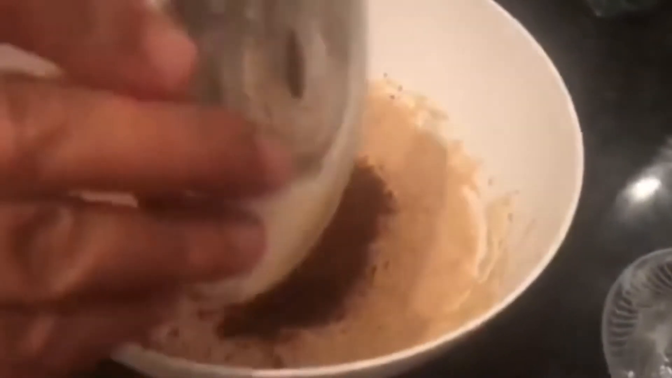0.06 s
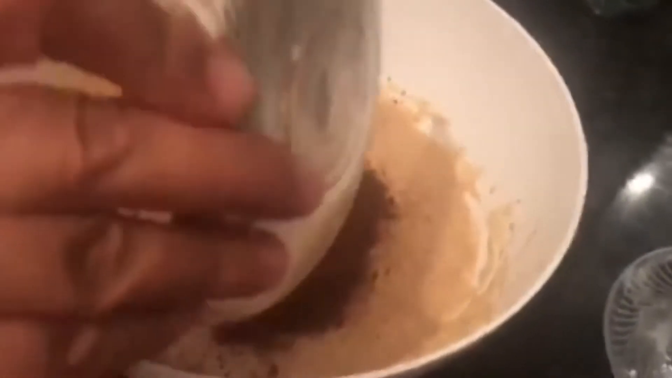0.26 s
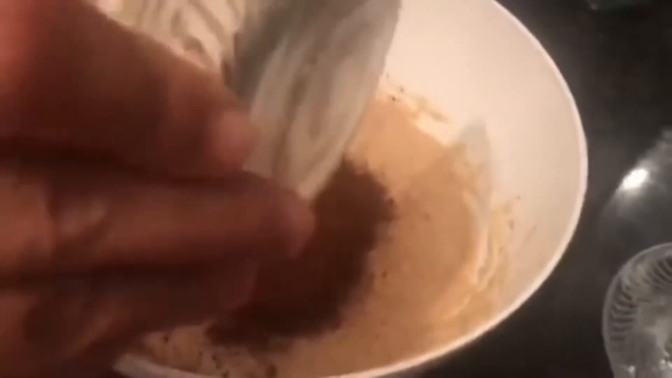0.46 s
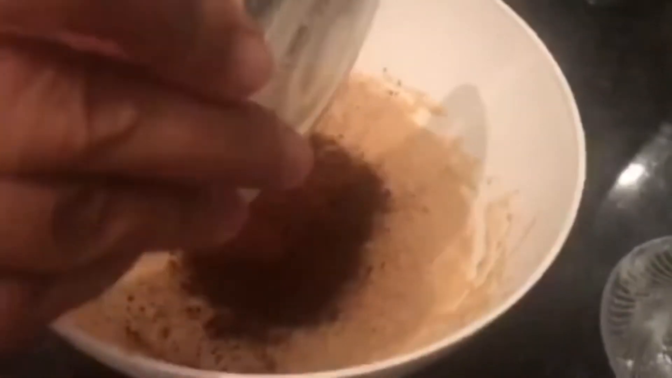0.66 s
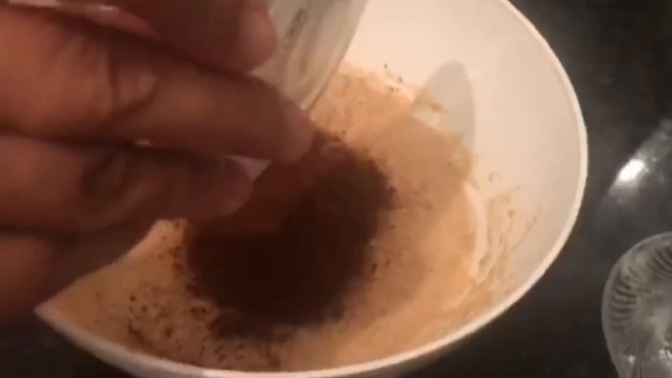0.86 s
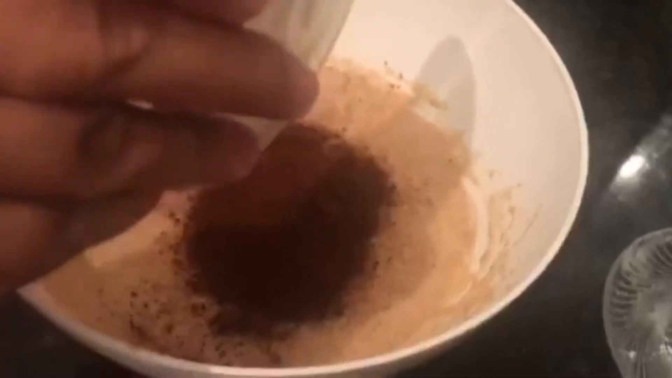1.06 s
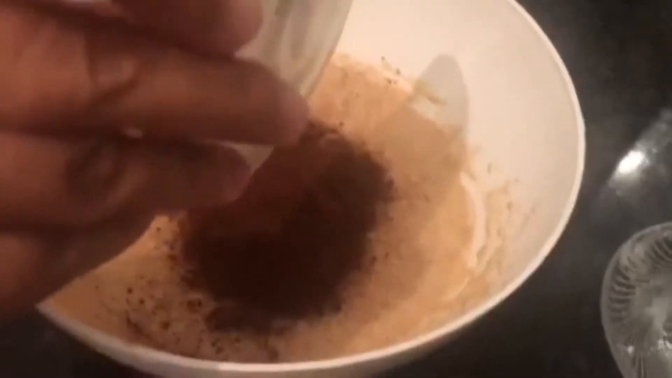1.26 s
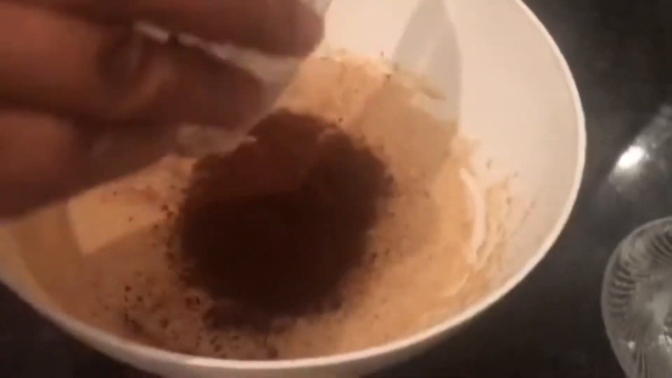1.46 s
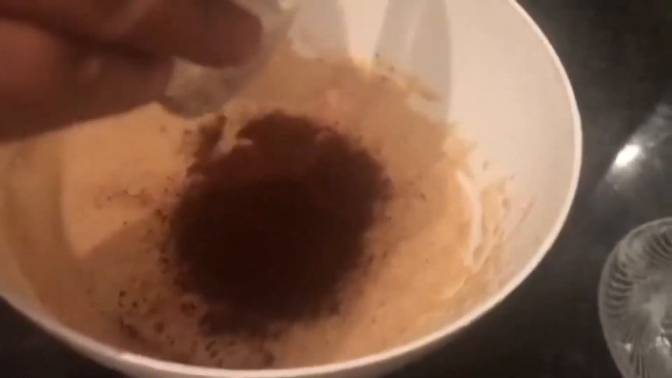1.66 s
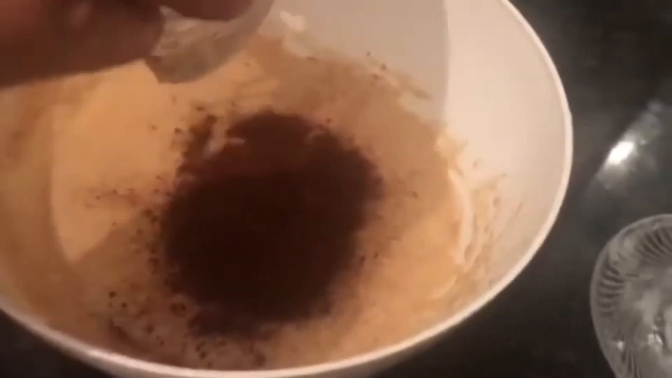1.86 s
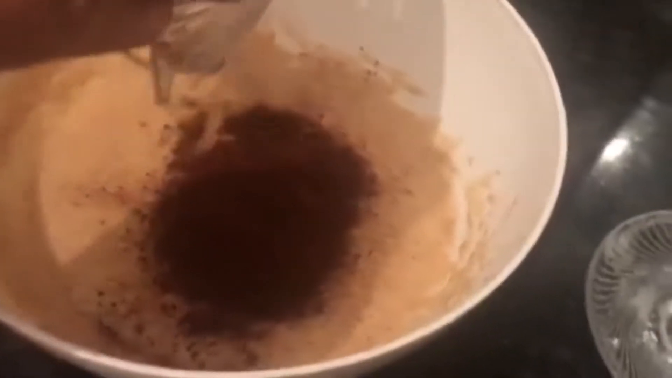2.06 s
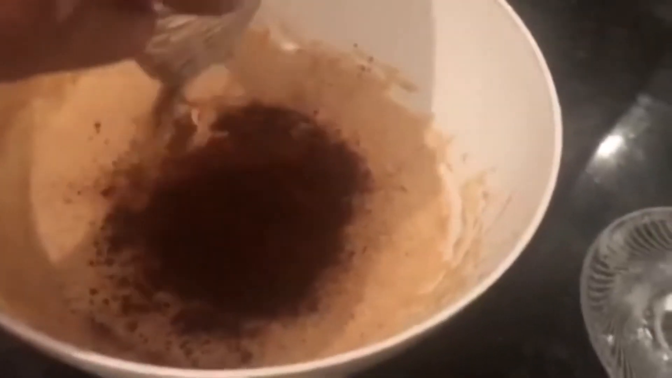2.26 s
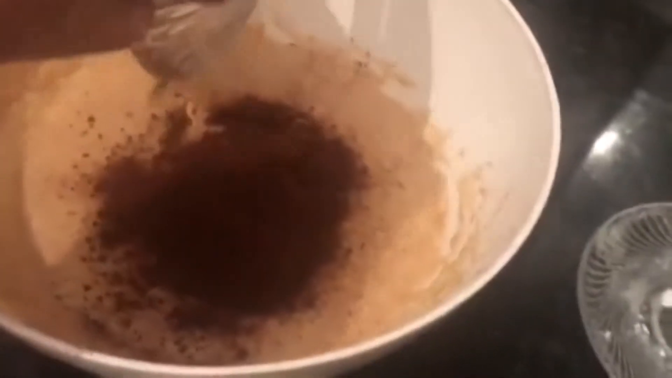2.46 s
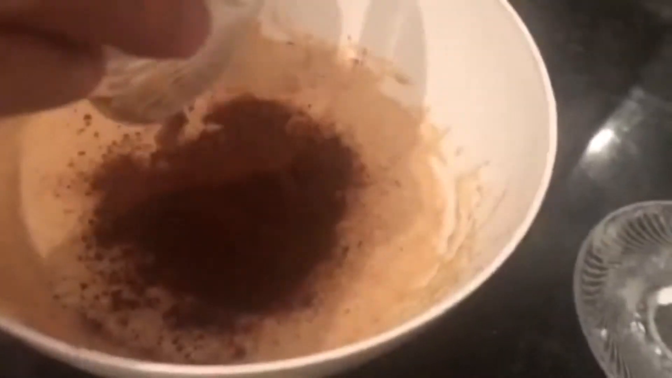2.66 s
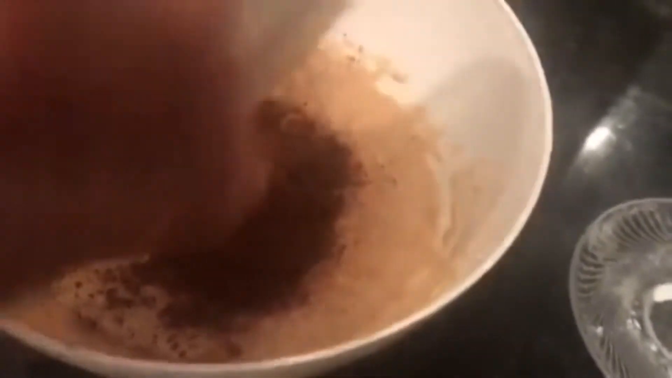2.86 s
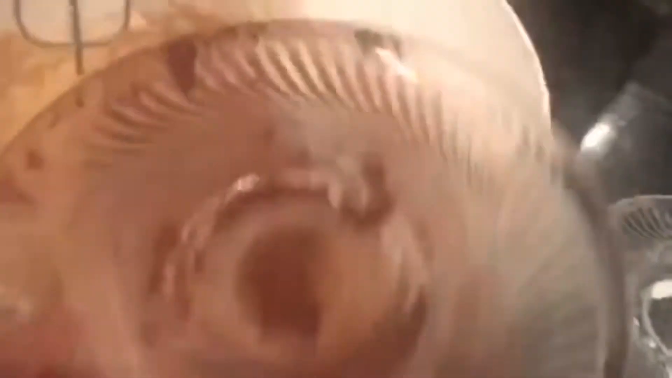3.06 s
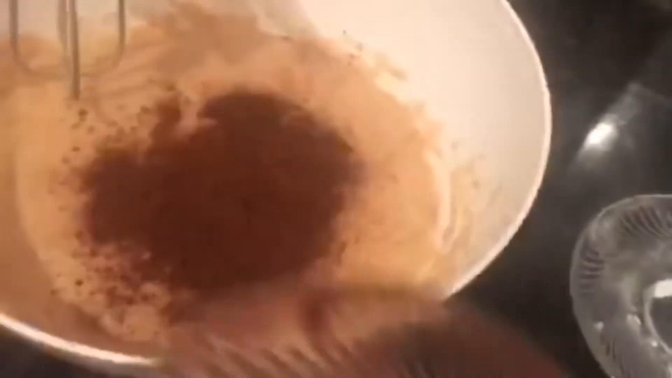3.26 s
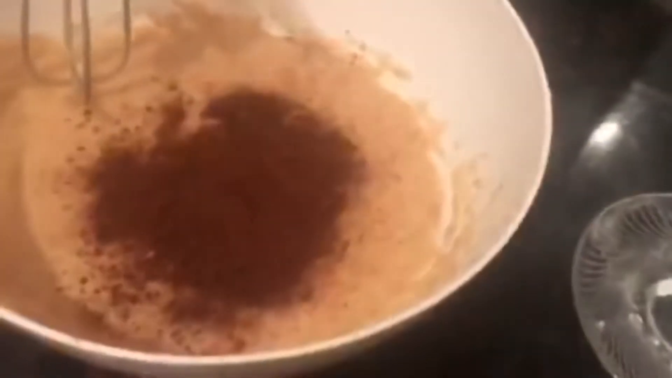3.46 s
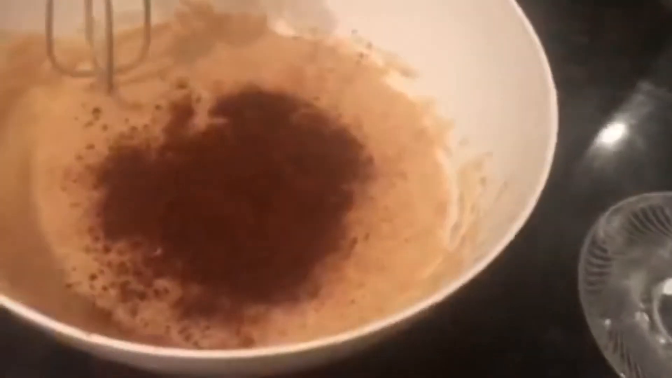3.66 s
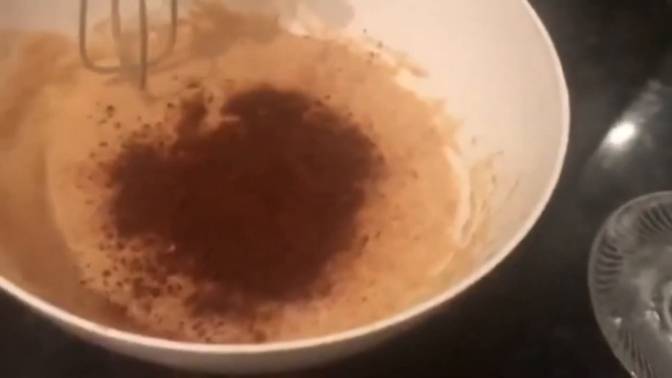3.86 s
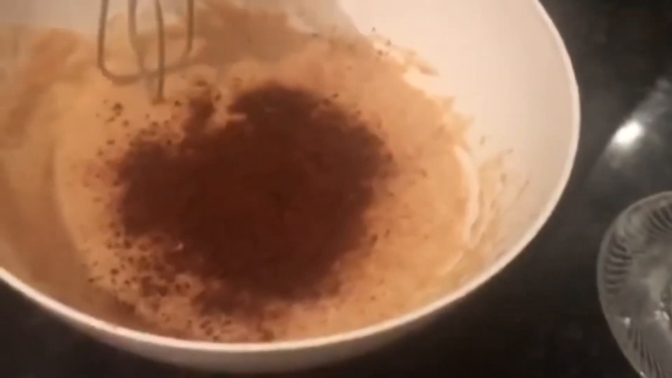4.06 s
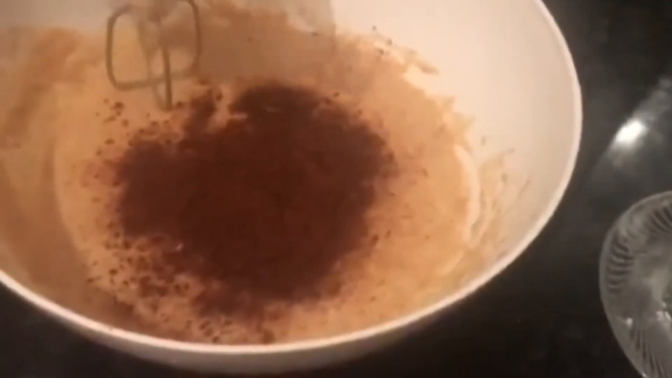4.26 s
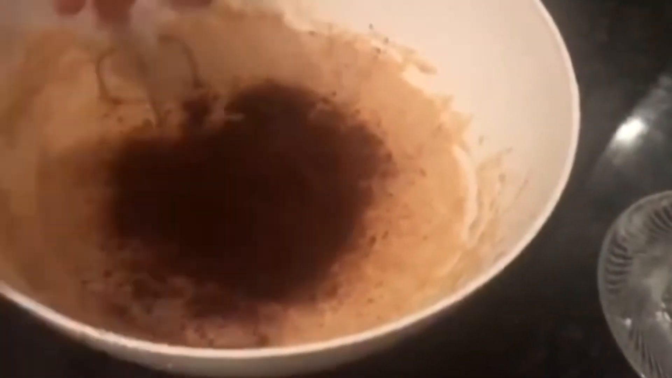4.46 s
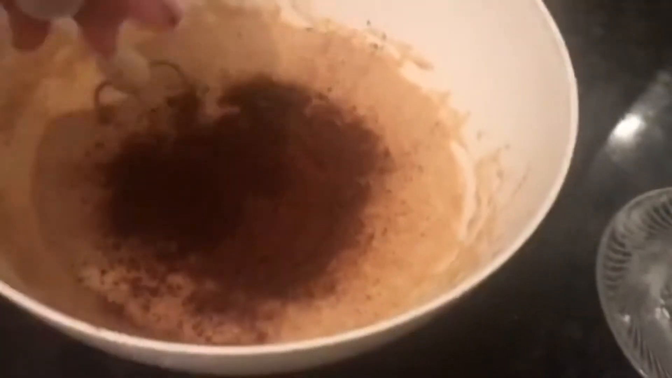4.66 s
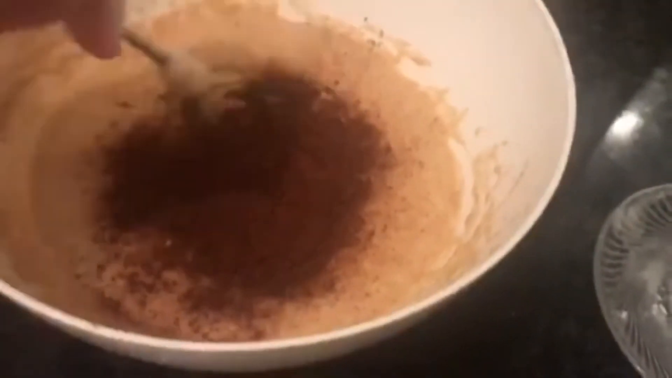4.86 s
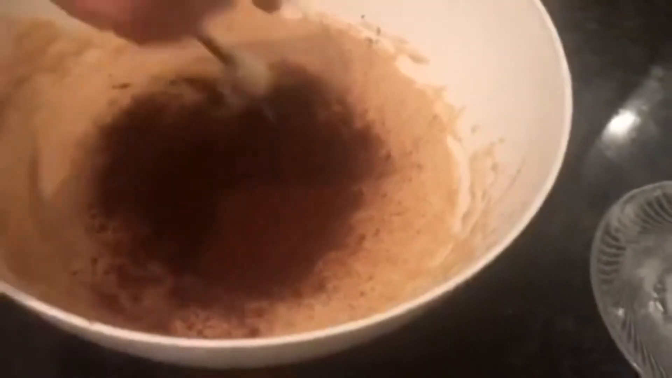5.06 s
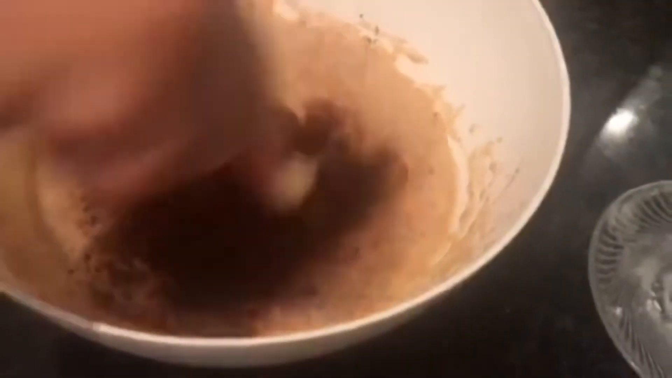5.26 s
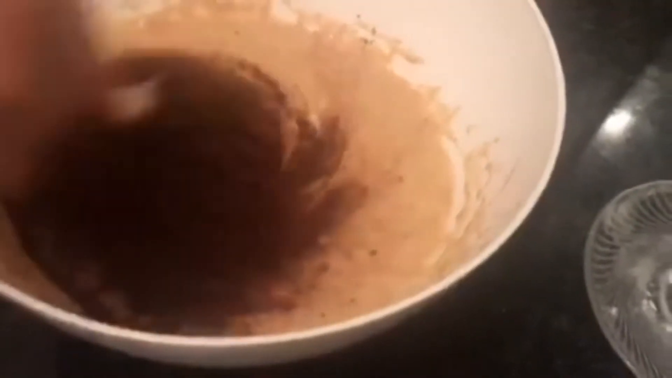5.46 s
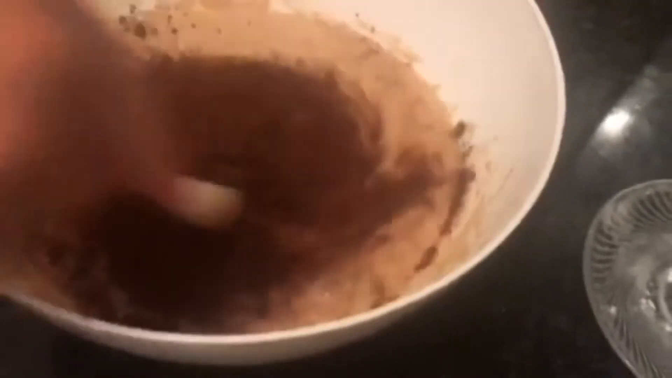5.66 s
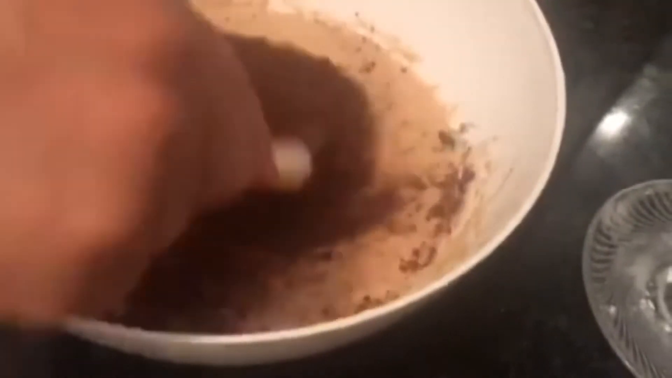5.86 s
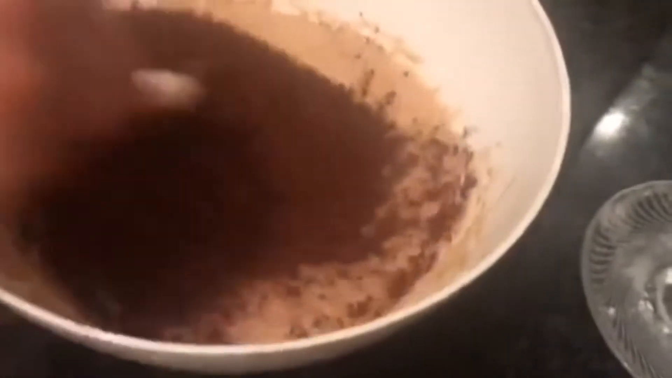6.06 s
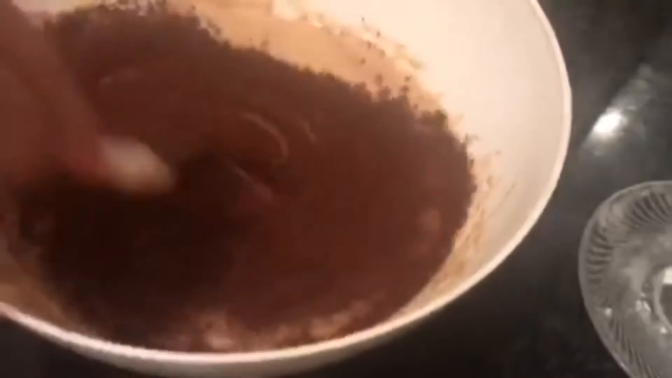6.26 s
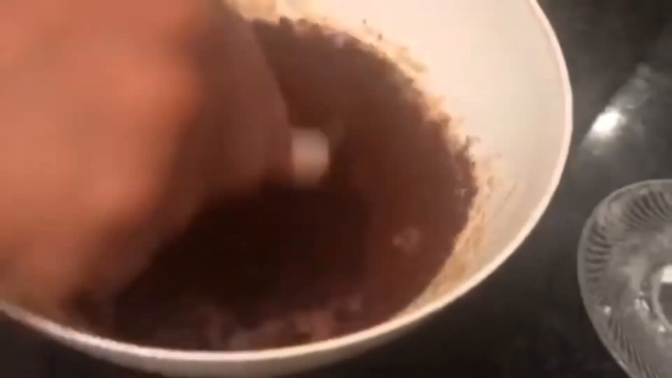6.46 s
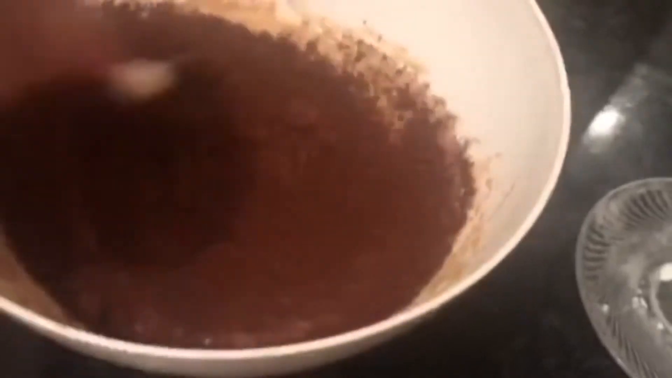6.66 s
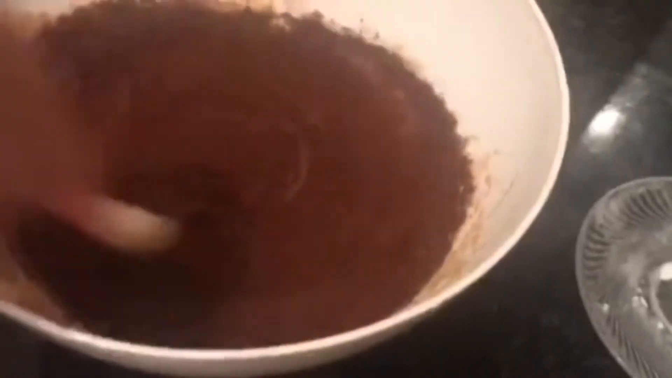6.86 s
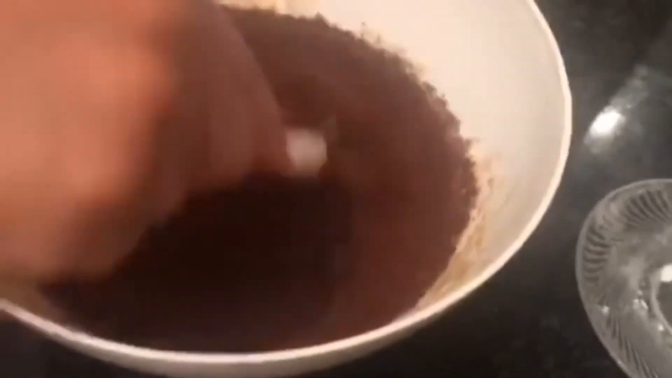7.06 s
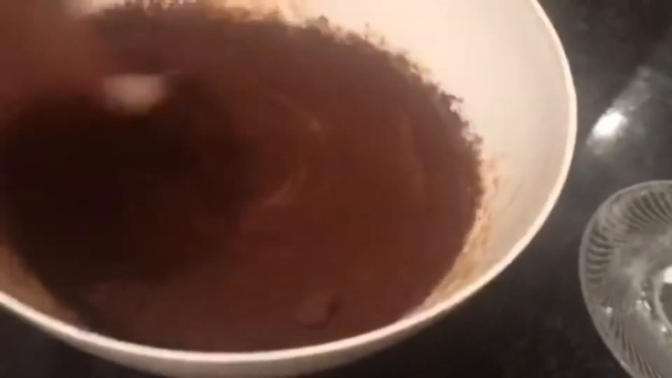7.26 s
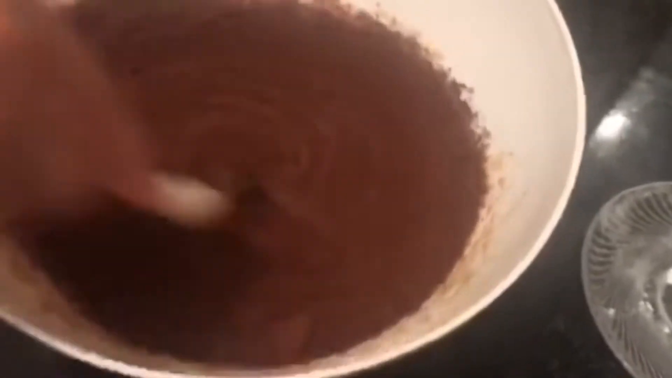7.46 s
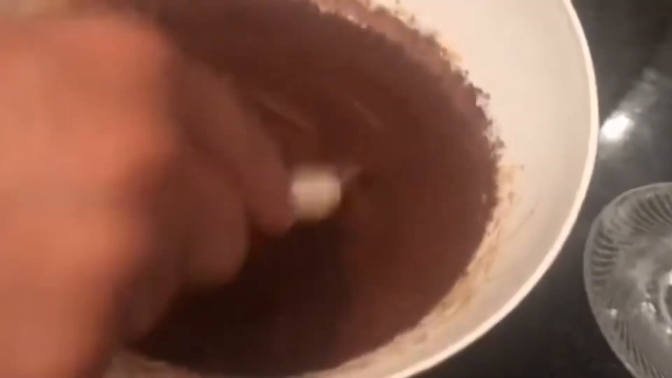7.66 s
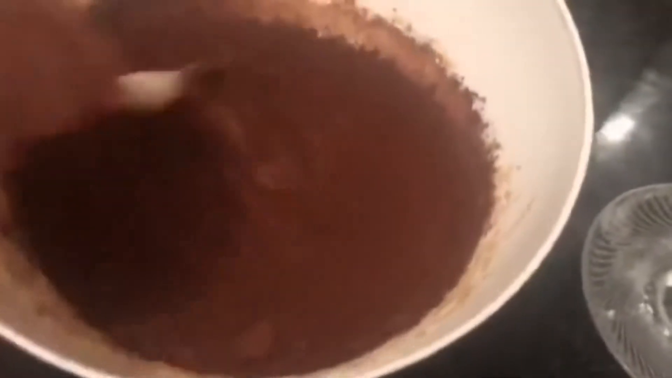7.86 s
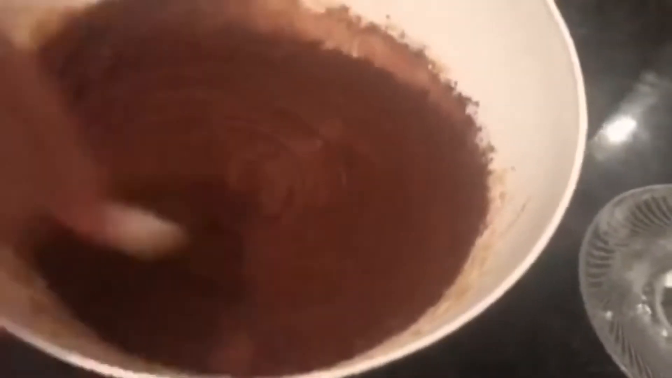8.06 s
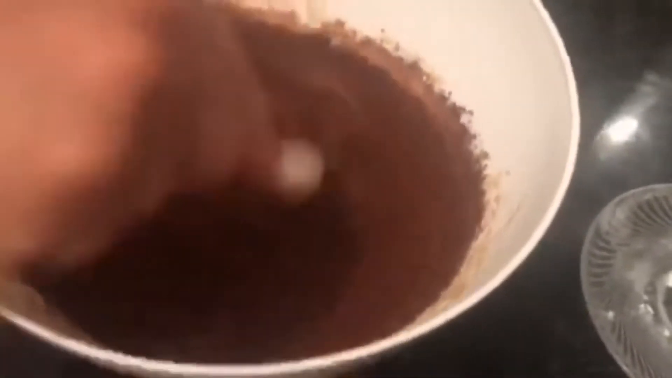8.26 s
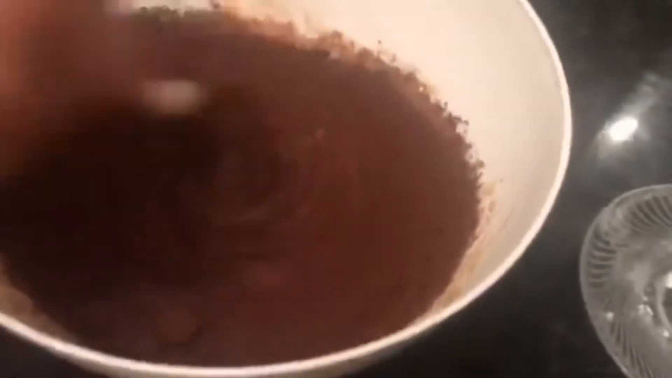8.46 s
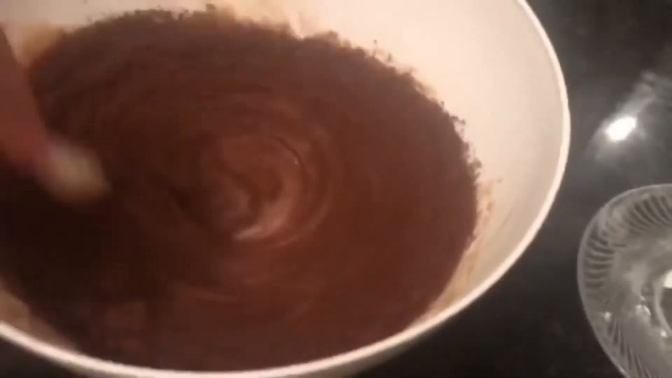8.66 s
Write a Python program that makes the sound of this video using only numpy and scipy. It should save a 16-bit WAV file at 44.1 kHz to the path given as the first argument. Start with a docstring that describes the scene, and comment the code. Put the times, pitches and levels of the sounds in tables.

```python
"""In a small kitchen a glass dish bumps a large bowl of batter, fingers tick on the dish and cocoa slides off it;
it bumps the bowl again and is set down on a second glass dish with a clatter of choked, ringing modes.
Then a wire beater stirs the thick batter by hand: wires scrape as noisy grains, tick on the wall and slap
air pockets shut as damped swings that wake the bowl. An appliance hums throughout, over still air."""
import sys
import numpy as np
from scipy import signal
from scipy.fft import rfft, irfft
from scipy.io import wavfile

SR = 44100
rng = np.random.default_rng(int(sys.argv[2]) if len(sys.argv) > 2 else 0)


def int16_out(signal):
    """Quantize to a 16-bit WAV file."""
    q = np.round(np.clip(np.atleast_2d(signal).T, -1, 1) * 32767)
    wavfile.write(sys.argv[1], SR, q.astype(np.int16))


N = 384111

# colour of a wire tick, also of the sticky crackle: (f/Hz, relative density/dB)
WIRE_TICK = [(100, -9), (400, -0.5), (800, 6), (1400, 3), (1850, -3.5), (2200, -2), (4000, -5.5),
             (7000, -14.5), (9000, -16), (10000, -51)]
# bright colour of scraping wires, sliding cocoa and finger ticks: (f/Hz, relative density/dB)
RASP = [(1200, -10), (1900, -9.5), (2400, -5.5), (3200, 1.5), (4300, -4.5), (5100, -7.5), (6300, -5.5),
        (7400, -20), (8700, -10), (9600, -51.5)]


def from_db(db):
    """Decibels to gain."""
    return 10 ** (np.asarray(db) / 20)


def rms_one(x):
    """Scale to rms 1."""
    return x / np.sqrt(np.mean(x ** 2) + 1e-20)


def seconds(size):
    """Time axis in seconds."""
    return np.arange(size) / SR


def fade(t, t60):
    """Exponential decay, 60 dB in t60 seconds."""
    return np.exp(-np.log(1000) * t / t60)


def swing(age):
    """Swell to 1 at age 1, then die away."""
    return age ** 2 * np.exp(2 * (1 - age))


def low_pass(x, order, cutoff_hz):
    """Butterworth filter that dulls the sound above the cutoff."""
    return signal.sosfilt(signal.butter(order, cutoff_hz, fs=SR, output="sos"), x)


def add(out, s, sound):
    """Mix a sound in from time s."""
    i = max(0, round(s * SR))
    out[i:i + len(sound)] += sound[:max(0, N - i)]


def response(spectrum, patchy_db=0, size=2048):
    """Causal minimum-phase impulse response of a spectrum with random peaks and dips, energy 1."""
    hz, db = np.transpose(spectrum)
    bins = np.fft.rfftfreq(size, 1 / SR)
    peaks_hz = np.geomspace(200, 10000, num=48)
    shape = np.interp(np.log(bins + 1), np.log(hz), db)
    shape += patchy_db * np.interp(bins, peaks_hz, rng.standard_normal(len(peaks_hz)))
    # folding the cepstrum puts the energy as early as possible
    cepstrum = irfft(np.log(from_db(shape)))
    cepstrum[1:size // 2] *= 2
    cepstrum[size // 2 + 1:] = 0
    h = irfft(np.exp(rfft(cepstrum)))
    return h / np.linalg.norm(h)


def through(x, h):
    """Pass x through an impulse response."""
    return signal.fftconvolve(x, h)[:len(x)]


def drift(rate):
    """Random wander with `rate` knots per second, rms 1."""
    knots = rng.standard_normal(int(rate * N / SR) + 2)
    return rms_one(np.interp(seconds(N) * rate, np.arange(len(knots)), knots))


def grains(per_s, spread_db, size=N):
    """Clicks at random times, with sizes scattered by spread_db, rms 1."""
    born = rng.random(size) < per_s / SR
    sign = rng.choice([-1, 1], size)
    strength = from_db(spread_db * np.clip(rng.standard_normal(size), -2, 2))
    return rms_one(born * sign * strength)


def ring(modes, t, vary_db, tilt_db=0):
    """Struck modes; each blow lands on another spot and so weights them anew."""
    hz, db, t60 = np.transpose(modes)[:, :, None]
    tilt = tilt_db * np.log2(hz / np.median(hz))
    db = db + tilt + vary_db * rng.standard_normal(hz.shape)
    waves = rng.choice([-1, 1], hz.shape) * np.sin(2 * np.pi * hz * t)
    return np.sum(from_db(db) * waves * fade(t, t60), axis=0)


def contact(h, t, chatter, t60):
    """A hard click followed by brief chatter, coloured by h; height about 1."""
    force = chatter * rng.standard_normal(len(t)) * fade(t, t60)
    force[0] += 1
    return through(force / np.linalg.norm(force), h) / np.abs(h).max()


def beating():
    """Wires scrape the bowl, longer with a longer lead, then hit the wall and slap an air pocket shut."""
    # strokes: (slap t/s, lead of the scrape peak/s, scrape level/dB, tick level/dB,
    #   tick muffled by batter above f/Hz, plop level/dB, plop f/Hz at its peak, heave level/dB)
    strokes = [(4.718, 0.12, -62, -41, 3010, -24, 198.4, -28),
               (4.998, -0.024, -69.5, -41.5, 6920, -67, 608, -53),
               (5.3, 0.06, -68, -34.5, 5000, -35, 635, -44),
               (5.323, 0.0024, -63, -36.5, 5000, -45, 397, -44),
               (5.393, 0.0066, -62, -37, 3000, -26, 674, -36),
               (5.534, 0.026, -50, -30.5, 4930, -20, 446, -33),
               (5.705, 0.033, -54.5, -40, 4960, -51, 500, -50),
               (5.977, 0.049, -55.5, -23.5, 3730, -24, 570, -28.5),
               (6.059, -0.041, -73, -48, 2000, -24.5, 295, -38),
               (6.072, -0.018, -51, -22, 9100, -46, 493, -43),
               (6.1253, 0.027, -65, -42, 2500, -27.5, 430, -44),
               (6.281, 0.038, -44.5, -26, 4020, -24, 400, -31),
               (6.395, 0.011, -51.5, -30, 2500, -24.5, 680, -48),
               (6.431, 0.0022, -56.5, -27, 2000, -24.5, 390, -28.5),
               (6.601, 0.018, -51.5, -23.5, 4000, -26.5, 415, -37),
               (6.703, 0.0011, -55, -28.5, 4000, -26.5, 617, -49),
               (6.725, -0.0041, -54.5, -39, 3000, -26, 392, -35.5),
               (6.884, 0.0019, -56, -37, 3000, -31.5, 630, -37.5),
               (7.0174, 0.011, -47.5, -24, 3960, -17, 375, -31.5),
               (7.196, 0.0032, -52.5, -17.5, 12900, -27, 675, -33),
               (7.349, 0.045, -46, -35, 3020, -30.5, 437, -43),
               (7.417, 0.056, -58, -46, 2000, -31, 400, -52),
               (7.502, 0.034, -44.5, -20, 4500, -20.5, 494, -32.5),
               (7.6321, 0.022, -46, -21.5, 6100, -16, 392, -39),
               (7.786, 0.032, -45.5, -20.5, 2800, -16.5, 695, -30),
               (7.896, .003, -51, -27, 4010, -23.5, 726, -48.5),
               (7.958, 0.013, -76, -56, 2000, -32.5, 340, -44),
               (7.996, 0.0017, -64.5, -42, 2000, -28.5, 546, -43),
               (8.041, -0.0083, -58, -30, 5000, -24, 370, -50),
               (8.088, 0.03, -49, -26, 4000, -32.5, 453, -52),
               (8.109, -0.036, -66, -32.5, 2000, -17.5, 346, -26.5),
               (8.301, 0.084, -43.5, -32, 2500, -19.5, 397, -31),
               (8.371, 0.069, -60.5, -29.5, 4000, -41, 303, -48),
               (8.411, 0.038, -65.5, -28, 2460, -18.5, 336, -27.5),
               (8.491, 0.0078, -46, -24.5, 3480, -20.5, 630, -44),
               (8.502, 0.0091, -73, -34, 3000, -19.5, 394, -35),
               (8.603, 0.036, -54, -47, 4020, -39, 610, -57),
               (8.647, -0.022, -56, -21, 5000, -38, 696, -50)]
    s, lead, scrape_db, tick_db, top_hz, plop_db, hz, heave_db = np.transpose(strokes)
    stretch = 0.045 * np.maximum(lead, 0)   # seconds
    rise, fall = 0.025 + stretch, 0.028 + stretch
    # the more batter the wires push, the more the bowl sounds under them
    hollow_db = -10.5 + 0.21 * (plop_db - scrape_db)
    scrapes = scraping(np.c_[s - lead, rise, fall, scrape_db, hollow_db], rasp_db=2.7, body_db=6.0)
    slaps = bowl_blows(np.c_[s, tick_db, top_hz, plop_db, hz, heave_db], WIRE_TICK,
                       tick_db=7.5, thud_db=-4.5, bowl_db=8.5, ring_follows_tick=0.47,
                       glide=0.84, chatter_t60=0.027, select_db=6.0)
    return scrapes + slaps + bursts()


def scraping(rows, rasp_db, body_db):
    """Slips over grains: bright rasp, grit and a singing band above a hollow body, recoloured each time."""
    # hollow voice of the bowl under the scrape: (f/Hz, relative density/dB)
    body_spectrum = [(120, -26.5), (280, -10), (650, 19.5), (1000, 4.5), (1500, 15), (1850, -7.5),
                     (2100, 15.5), (3000, -42.5)]
    colour_db, grit_db, sing_db = 4.2, -7, -9.5
    out, t = np.zeros(N), seconds(size=16000)
    middle = t.mean()
    for s, rise, fall, db, hollow_db in rows:
        pressure = np.exp(-((t - middle) / np.where(t < middle, rise, fall)) ** 2 / 2)
        rasp = wires(RASP, per_s=600, spread_db=0.0, patchy_db=colour_db, grip_db=3.2, size=len(t), count=3)
        # coarse grains crunch
        grit = through(grains(per_s=170, spread_db=1.0, size=len(t)), response(RASP, colour_db))
        bright = off_the_wall(rasp + from_db(grit_db) * grit + from_db(sing_db) * singing(t), t)
        body = through(grains(per_s=450, spread_db=3.5, size=len(t)), response(body_spectrum, patchy_db=4.0))
        voice = from_db(rasp_db) * bright + from_db(hollow_db + body_db) * body
        add(out, s - middle, from_db(db) * pressure * voice)
    return out * from_db(1.53 * drift(rate=120))


def wires(spectrum, per_s, spread_db, patchy_db, grip_db, size, count):
    """Several wires slip over grains, each with its own colour and its own unsteady grip; rms 1."""
    grip_change_s = 0.01396
    t = seconds(size)
    knots = np.arange(0, t[-1], grip_change_s)
    total = np.zeros(size)
    for _ in range(count):
        grip = from_db(grip_db * np.interp(t, knots, rng.standard_normal(len(knots))))
        total += grip * through(grains(per_s, spread_db, size), response(spectrum, patchy_db))
    return rms_one(total)


def singing(t):
    """A narrow, rough resonance that starts on a random pitch and glides along the scrape; rms 1."""
    low_hz, high_hz, width_hz, octaves_per_s = 3100, 4450, 140, 0.95   # middle pitch, bandwidth, top glide
    rough = low_pass(rng.standard_normal(len(t)), 2, width_hz)
    glide = octaves_per_s * rng.uniform(-0.48, 1) * (t - t.mean())
    pitch = rng.uniform(low_hz, high_hz) * 2 ** glide
    return rms_one(rough * np.sin(2 * np.pi * np.cumsum(pitch) / SR))


def off_the_wall(x, t):
    """One reflection from the near bowl wall, whose delay glides and so shifts the colour; rms 1."""
    echo, typical_s, octaves_per_s = 0.3, 0.001098, 1.8   # gain, delay, greatest glide of the delay
    glide = octaves_per_s * rng.uniform(-1, 1) * (t - t.mean())
    delay = typical_s * 2 ** (rng.uniform(-0.52, 0.52) + glide)
    return rms_one(x + echo * np.interp(t - delay, t, x))


def bowl_blows(rows, tick_spectrum, tick_db, thud_db, bowl_db, ring_follows_tick, glide, chatter_t60, select_db):
    """A tick, a damped swing sinking in pitch, a low heave and the bowl's ring, weak for cushioned blows."""
    # modes of the bowl with batter in it: (f/Hz before detuning, relative level/dB, t60/s)
    bowl = [(88, -20, 0.13), (171, -22.5, 0.17), (201.7, -22, 0.18), (280.4, -13.5, 0.073),
            (371, -17.5, 0.08), (437, -28.5, 0.06), (541, -17, 0.16), (606, -15, 0.13),
            (704.5, -10.5, 0.061), (1195, -7, 0.027)]
    swell_s, reference_hz = 0.00287, 454   # lower thuds swell more slowly
    heave_hz, heave_swell_s, heave_octaves = 177, 0.0051, 0.25   # typical pitch, swell, scatter of pitch
    out, t = np.zeros(N), seconds(size=12000)
    mode_hz, mode_db, mode_t60 = np.transpose(bowl)
    for s, hard_db, top_hz, soft_db, hz, heave_db in rows:
        # the mass of batter swings after every blow
        mass_hz = heave_hz * 2 ** (heave_octaves * rng.standard_normal())
        heave = swing(t / heave_swell_s) * np.sin(2 * np.pi * mass_hz * t)
        age = t / (swell_s * np.sqrt(reference_hz / hz))
        pitch = hz * (1 + glide * (np.exp((1 - age) / 2) - 1))   # passes hz at the peak
        thud = swing(age) * np.sin(2 * np.pi * np.cumsum(pitch) / SR)
        slosh = 1 + 0.06 * rng.standard_normal(len(mode_hz))   # the moving batter detunes the bowl
        # modes far from the thud's pitch are woken less
        woken_db = mode_db - select_db * np.abs(np.log2(mode_hz / hz))
        modes = np.c_[slosh * mode_hz, woken_db, mode_t60]
        ring_db = bowl_db + soft_db + ring_follows_tick * (hard_db - soft_db)
        bowl_ring = from_db(ring_db) * ring(modes, t, vary_db=2.5) * (1 - np.exp(-age))
        tick = contact(response(tick_spectrum), t, chatter=0.17, t60=chatter_t60)
        tick = from_db(hard_db + tick_db) * low_pass(tick, 2, top_hz)
        add(out, s, from_db(soft_db + thud_db) * thud + bowl_ring + from_db(heave_db) * heave + tick)
    return out


def bursts():
    """Each small bubble snaps open and its cavity rings on briefly."""
    # bubbles: (t/s, level/dB, f/Hz)
    bubbles = [(5.299, -33.5, 1550), (5.321, -36.5, 1830), (6.822, -40, 1800), (6.837, -46, 2080),
               (7.634, -28.5, 1320), (7.786, -31, 1290), (8.038, -32.5, 1630), (8.295, -31, 1480),
               (8.572, -32, 1530), (8.602, -26, 1700)]
    swell_s, ring_db, ring_t60 = 0.00083, -19, 0.039
    out, t = np.zeros(N), seconds(size=4000)
    for s, db, hz in bubbles:
        envelope = swing(t / swell_s) + from_db(ring_db) * fade(t, ring_t60)
        add(out, s, from_db(db) * envelope * np.sin(2 * np.pi * hz * t))
    return out


def churning():
    """Air pockets open and close in the moving batter, with faint sticky crackle and a soft bowl rumble."""
    # overall course of the batter at work: (t/s, level/dB)
    course = [(0, -80), (4.398, -71.5), (5.201, -59), (5.5, -53.5), (5.8, -60), (6.1, -55.5),
              (6.998, -56.5), (8.71, -51.5)]
    large = pops(low_hz=204.3, high_hz=857.5, per_s=33, spread_db=3.0, cycles=42, count=9)
    small = pops(low_hz=990, high_hz=2204, per_s=6, spread_db=2.0, cycles=20, count=6)
    crackle = through(grains(per_s=190, spread_db=0.5), response(WIRE_TICK))
    # the held bowl shifts on the counter: noise from 35 to 140 Hz
    band = signal.butter(2, [35, 140], "band", fs=SR, output="sos")
    wobble = rms_one(signal.sosfilt(band, rng.standard_normal(N)))
    mix = from_db(-1) * large + from_db(-15.5) * small + from_db(-5) * crackle + from_db(-7.5) * wobble
    return from_db(np.interp(seconds(N), *np.transpose(course))) * mix


def pops(low_hz, high_hz, per_s, spread_db, cycles, count):
    """Air pockets of several sizes close at random, 60 dB down after the given cycles; rms 1."""
    t = seconds(size=3000)
    total = np.zeros(N)
    for hz in np.geomspace(low_hz, high_hz, num=count):
        pocket = np.sin(2 * np.pi * hz * t) * fade(t, cycles / hz)
        total += through(grains(per_s, spread_db), pocket)   # per_s counts for each size
    return rms_one(total)


def dishes():
    """The dish rocks on its neighbour and the counter: its modes bend and are choked to a faint after-ring."""
    # glass on glass and counter: (t/s, crack level/dB, counter level/dB, dish level/dB, second dish level/dB,
    #   brightness/dB per octave, time until choked/s, pitch bend/Hz)
    clinks = [(3.652, -56, -59.5, -49.5, -62.5, 8, 0.0043, 2),
              (3.6758, -13, -32, -4.5, -2, 2, 0.014, -17.5), (3.7011, -18, -27, -12.5, -18, -1, 0.018, -15),
              (3.979, -28.5, -42, -30, -20.5, 1, 0.014, 1),
              (4.0957, -9.5, -22, -15, -37, -0.5, 0.053, -0.5),
              (4.1531, -15.5, -26.5, -1.5, -23.5, 8.5, 0.081, -1),
              (4.170, -35, -26, -18, -47, -5.5, 0.084, -1), (4.2158, -14.5, -28, -12, -36, 2.5, 0.035, 1),
              (4.234, -34, -32, -33, -46, -7, 0.04, -0.5)]
    # mode pitches of the first dish before bending: (f/Hz)
    dish_hz = [1570, 3318, 4426, 4838, 6832, 9411]
    # free ring of those modes: (relative level/dB, t60/s)
    dish_ring = [(-2, 0.84), (1, 0.65), (-27.5, 0.09), (5.5, 0.057), (-20, 0.2), (-18, 0.078)]
    # slow ring of those modes that outlasts the choking: (relative level/dB)
    after_ring_db = [-20.5, -24.5, -37.5, -40.5, -43.5, -56.5]
    # mode pitches of the second dish: (f/Hz)
    second_hz = [797, 1420, 3430, 3682, 4152, 4938, 5022, 5233, 5620, 6500, 7300, 7405, 7520]
    # ring of the second dish, in the same order: (relative level/dB, t60/s)
    second_ring = [(-26, 0.16), (-22.5, 0.13), (-13.5, 0.071), (-20.5, 0.05), (-21.5, 0.4), (-9, 0.033),
                   (-15.5, 0.054), (-6.5, 0.08), (-11.5, 0.038), (-24.5, 0.18), (-21, 0.056), (-22, 0.09),
                   (-21.5, 0.063)]
    # colour of the glass crack: (f/Hz, relative density/dB)
    crack_spectrum = [(60, -32), (200, -3.5), (500, -10), (1200, 0), (2700, 2.5), (5100, -5.5),
                      (5800, -15.5), (6900, -9.5), (8200, -23.5), (10000, -26)]
    # colour of the knocked counter: (f/Hz, relative density/dB)
    counter_spectrum = [(50, -13), (130, -8.5), (280, 1), (600, -1), (1000, 0), (1600, -21.5),
                        (4000, -40.5)]
    after_t60 = np.full(len(dish_hz), 0.42)
    out, t = np.zeros(N), seconds(size=26000)
    for s, crack_db, counter_db, dish_db, second_db, tilt_db, hold, bend_hz in clinks:
        crack = from_db(crack_db + 12.0) * contact(response(crack_spectrum), t, chatter=0.12, t60=0.024)
        counter = from_db(counter_db + 9.5) * contact(response(counter_spectrum), t, chatter=0.37, t60=0.24)
        mode_hz = np.array(dish_hz) + bend_hz
        choke = np.exp(-np.minimum(t / hold, 3) ** 4)
        free = choke * ring(np.c_[mode_hz, dish_ring], t, 0.91, tilt_db)
        after = ring(np.c_[mode_hz, after_ring_db, after_t60], t, 0.91, tilt_db)
        first = from_db(dish_db - 4.5) * (free + after)
        second = from_db(second_db) * ring(np.c_[second_hz, second_ring], t, 0.79, tilt_db)
        onset = 1 - np.exp(-t / 0.0026)
        add(out, s, crack + counter + (first + second) * onset)
    return out


def rattles():
    """Uneven runs of tiny contacts between the rocking dishes, thinning to nothing, in one glassy colour."""
    # runs of chatter: (t/s, length/s, level/dB)
    runs = [(3.682, 0.084, -31.5), (4.097, 0.027, -37.5), (4.151, .07, -22), (4.221, 0.036, -28)]
    # crowded resonances of the two dishes while they touch: (f/Hz, relative density/dB)
    touching = [(300, -20), (900, -8), (1400, -6.5), (1850, 0), (2300, -6), (2750, -1), (3600, -7),
                (4400, -2.5), (4900, 2.5), (5250, 0), (5600, -27.5), (6200, -25), (6900, -2), (7600, -30.5),
                (10000, -40)]
    out, t = np.zeros(N), seconds(size=9000)
    for s, length, db in runs:
        dying = np.sqrt(np.maximum(1 - t / length, 0))
        touches = grains(per_s=1100, spread_db=4.5, size=len(t)) * dying
        add(out, s, from_db(db) * through(touches, response(touching)))
    return out


def pouring():
    """The dish bumps the bowl, whose wall rings briefly; cocoa slides off in short puffs of scraped grains."""
    # bumps and rebounds: (t/s, tick level/dB, thud level/dB, thud f/Hz at its peak)
    bump_rows = [(0.0968, -12, -24, 396), (0.106, -58, -24.5, 274), (0.124, -51, -33, 96),
                 (0.138, -48, -25.5, 383), (.156, -63, -27.5, 206), (2.6195, -27, -21, 662),
                 (2.625, -36, -26.5, 200), (2.639, -52, -29, 432)]
    # colour of the dish's tick: (f/Hz, relative density/dB)
    bump_spectrum = [(100, -19), (400, -4), (800, 8), (1250, 9.5), (1650, 5), (2300, 5), (3000, -2.5),
                     (4600, -3), (7000, -7.5), (9000, -13.5), (10000, -57)]
    # modes of the bare wall above the batter: (f/Hz, relative level/dB, t60/s)
    bare_wall = [(1180, 4, 0.029), (1370, -13, 0.033), (1990, -4.5, 0.037), (2340, -9, 0.033),
                 (3390, -17, 0.036)]
    # cocoa sliding off the glass: (peak t/s, level/dB)
    sifts = [(2.2, -66), (2.756, -64), (2.987, -70)]
    top_hz, heave_db = 12000, -8   # dry glass is hardly muffled; heave relative to the thud's level
    blows = [(s, tick_db, top_hz, thud_db, hz, thud_db + heave_db) for s, tick_db, thud_db, hz in bump_rows]
    bumps = bowl_blows(blows, bump_spectrum, tick_db=4.5, thud_db=-1.0, bowl_db=4.0, ring_follows_tick=0.1,
                       glide=0.87, chatter_t60=0.011, select_db=0.5)
    for s, tick_db, _, _ in bump_rows:
        wall_db = -25.5 + 0.39 * tick_db   # the wall follows the tick in part
        add(bumps, s, from_db(wall_db) * ring(bare_wall, seconds(size=8000), vary_db=1.0))
    rise, fall, hollow_db = 0.014, 0.012, -25   # seconds, seconds, dB
    puffs = [(s, rise, fall, db, hollow_db) for s, db in sifts]
    return bumps + scraping(puffs, rasp_db=-0.5, body_db=-5.0)


def handling():
    """Tiny dry ticks of fingers on the dish."""
    # finger ticks: (t/s, level/dB)
    touches = [(1.66, -57), (1.789, -54), (2.197, -53), (2.748, -48), (2.997, -49), (3.507, -46)]
    out, t = np.zeros(N), seconds(size=3000)
    for s, db in touches:
        add(out, s, from_db(db) * contact(response(RASP, patchy_db=1.5), t, chatter=0.15, t60=0.012))
    return out


def tones(rows):
    """Unsteady tones that swell and fade, with a shared random waver of phase."""
    t = seconds(N)
    waver = 0.5 * drift(rate=65)   # radians
    total = np.zeros(N)
    for s, half, hz, db in rows:
        swell = np.exp(-((t - s) / half) ** 2)
        total += from_db(db) * swell * np.sin(2 * np.pi * hz * t + waver)
    return total


def background():
    """Still kitchen air as coloured noise, and the hum of an appliance wavering in phase and level."""
    # hum partials: (f/Hz, mean level/dB)
    partials = [(48.4, -71), (99.2, -57)]
    # colour of the air: (f/Hz, relative density/dB)
    air_spectrum = [(20, -12.5), (45, 5.5), (100, -1), (170, 0.5), (330, -5.5), (800, -10), (1500, -19.5),
                    (3000, -26.5), (6000, -31.5), (8800, -35), (9800, -59)]
    air_db = -56
    t, hum = seconds(N), np.zeros(N)
    for hz, db in partials:
        hum += from_db(db) * np.sqrt(2) * np.sin(2 * np.pi * hz * t + 0.41 * drift(rate=42))
    air = through(rng.standard_normal(N), response(air_spectrum))
    return hum * from_db(2.0 * drift(rate=5)) + from_db(air_db) * air


def kitchen(x, near_db, near_t60, room_db, room_t60, wall_hz):
    """Quick reflections off counter and cupboards, then the duller tail of the room."""
    t = seconds(size=22000)
    near, far = rng.standard_normal((2, len(t)))
    near = near * fade(t, near_t60) * (t > .003)
    far = far * fade(t, room_t60) * (t > .012)
    near = near / np.linalg.norm(near)
    far = low_pass(far / np.linalg.norm(far), 1, wall_hz)
    return x + through(x, from_db(near_db) * near + from_db(room_db) * far)


def scene():
    """Sounds in the bowl, on its rim and on the counter each get their own reflections, over the background."""
    # glass rubs on glass and squeaks: (t/s, half length/s, f/Hz, level/dB)
    squeaks = [(3.989, 0.0038, 3475, -23), (3.99, 0.0069, 1693, -33), (4.191, 0.0051, 6930, -26.5),
               (4.228, 0.007, 6880, -26)]
    # faint brief tones in the room: (t/s, half length/s, f/Hz, level/dB)
    faint_tones = [(0.914, 0.083, 1110, -64), (2.99, 0.059, 616, -56.5), (5.174, 0.064, 473, -54.5),
                   (5.794, 0.047, 1600, -60.5)]
    in_bowl = kitchen(beating() + churning(),
                      near_db=-10.5, near_t60=0.13, room_db=-7.5, room_t60=0.3, wall_hz=5000)
    on_rim = kitchen(pouring() + handling(),
                     near_db=-8, near_t60=0.098, room_db=-10.0, room_t60=0.34, wall_hz=3500)
    on_counter = kitchen(dishes() + rattles() + tones(squeaks),
                         near_db=-13.5, near_t60=0.12, room_db=-12.0, room_t60=0.39, wall_hz=2980)
    return (in_bowl + on_rim + on_counter + background() + tones(faint_tones))[None]


def record(dry):
    """The microphone drops the deepest bass, rounds the peaks and cuts the top steeply."""
    thin = signal.sosfilt(signal.butter(1, 30, "high", fs=SR, output="sos"), dry)
    rounded = 1.1 * np.tanh(thin / 1.1)
    return signal.sosfilt(signal.ellip(10, .2, 70, 9800, fs=SR, output="sos"), rounded)


dry = scene()
out = record(dry)
int16_out(out)
```